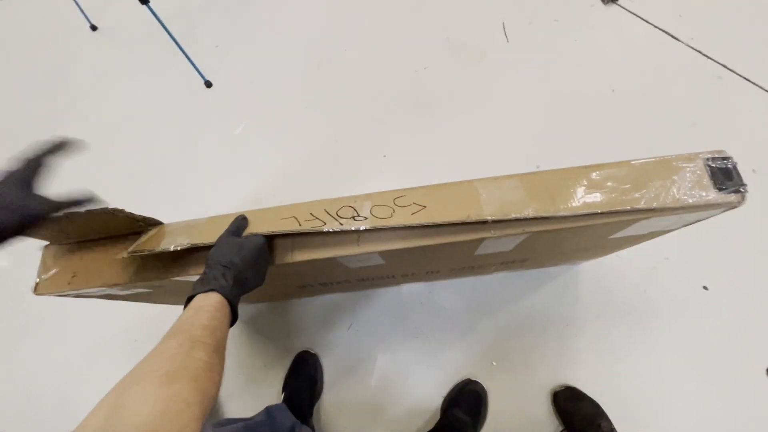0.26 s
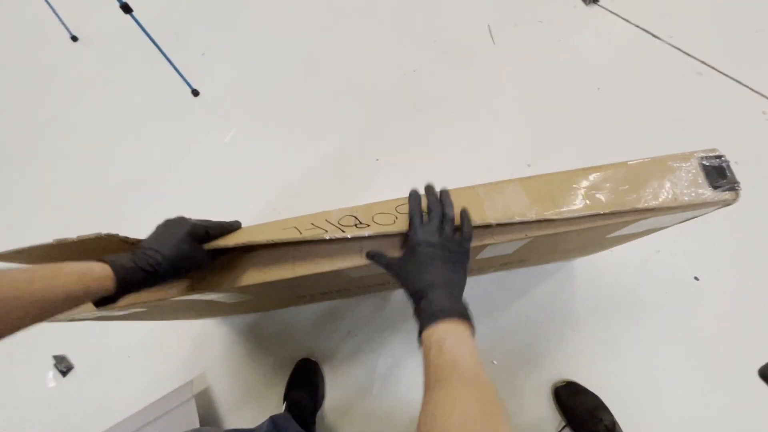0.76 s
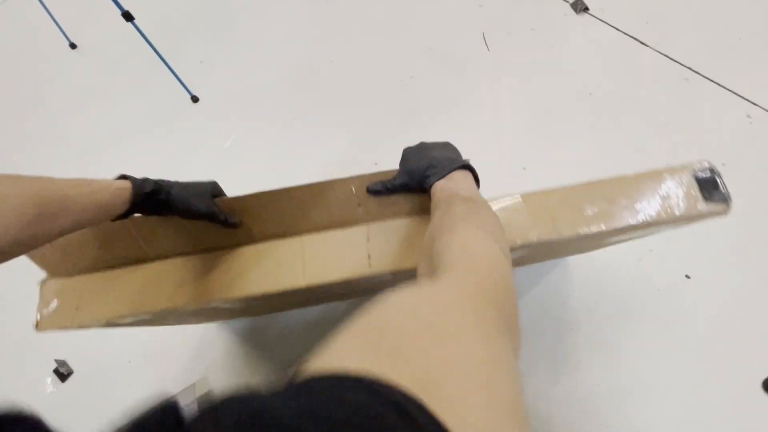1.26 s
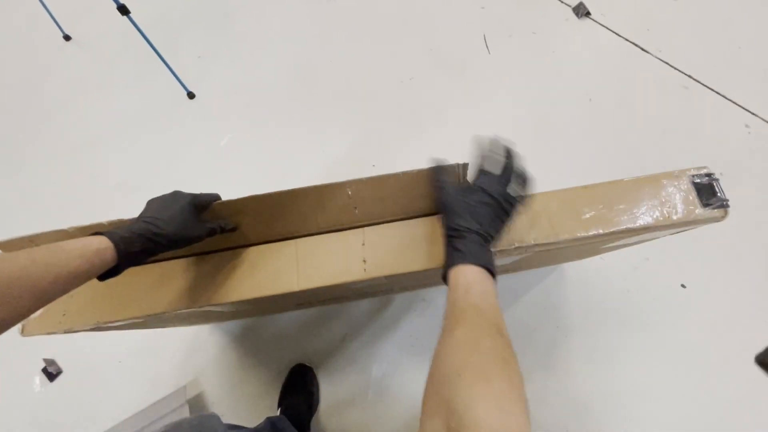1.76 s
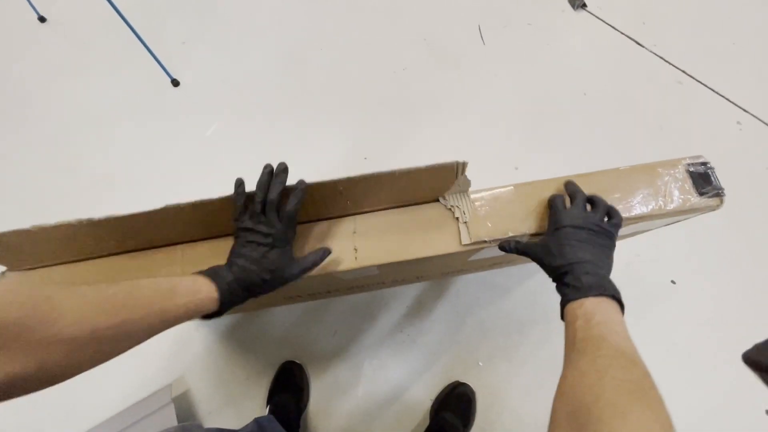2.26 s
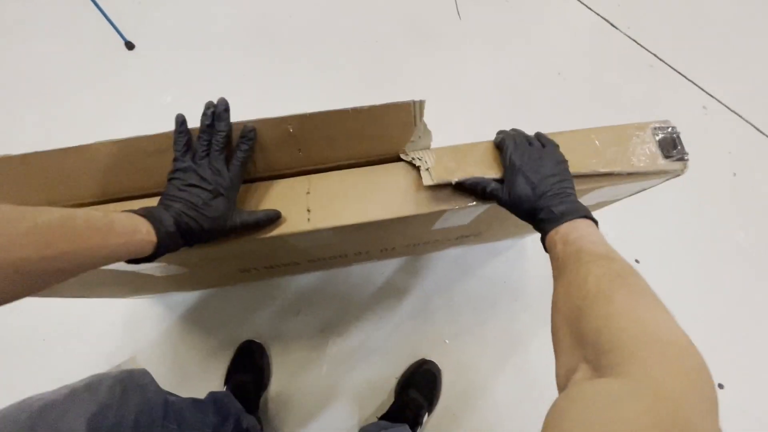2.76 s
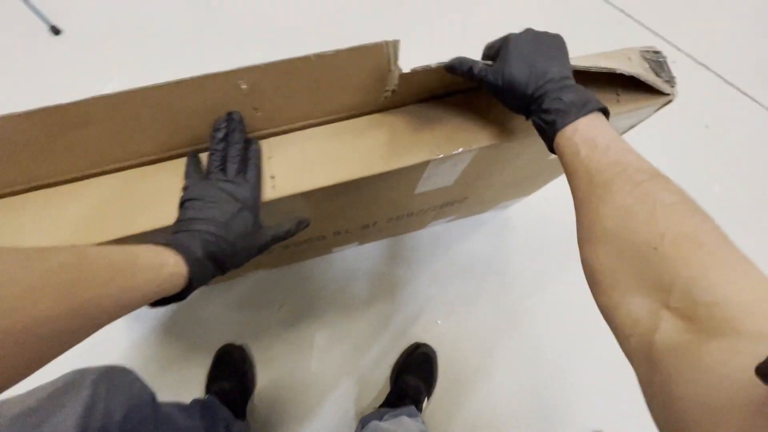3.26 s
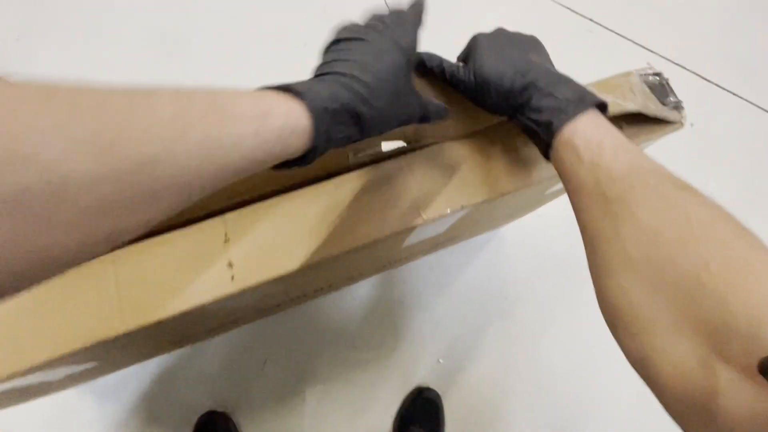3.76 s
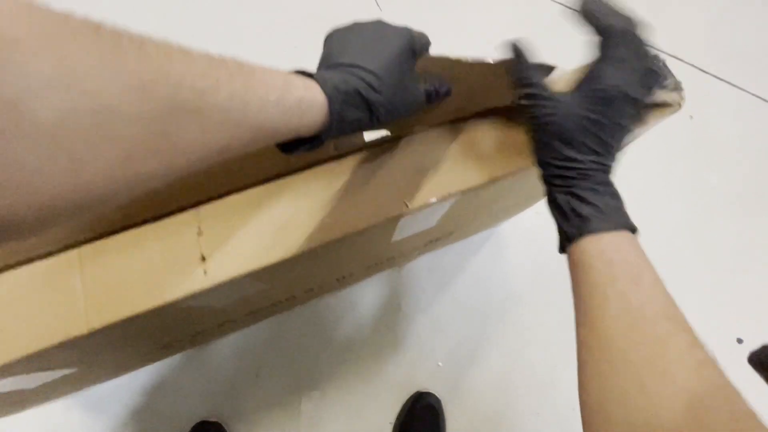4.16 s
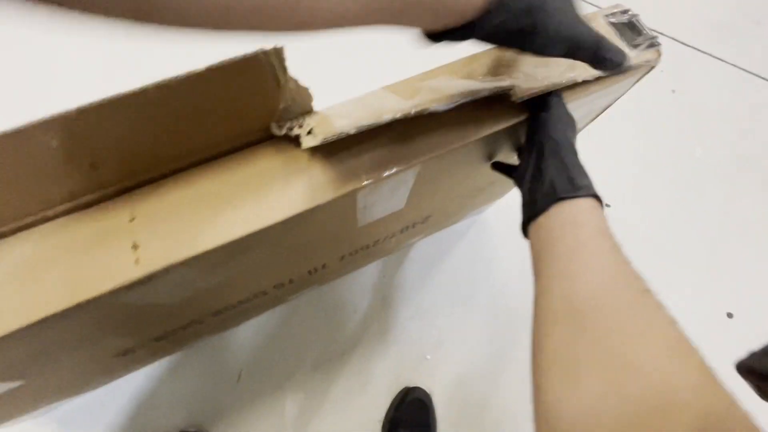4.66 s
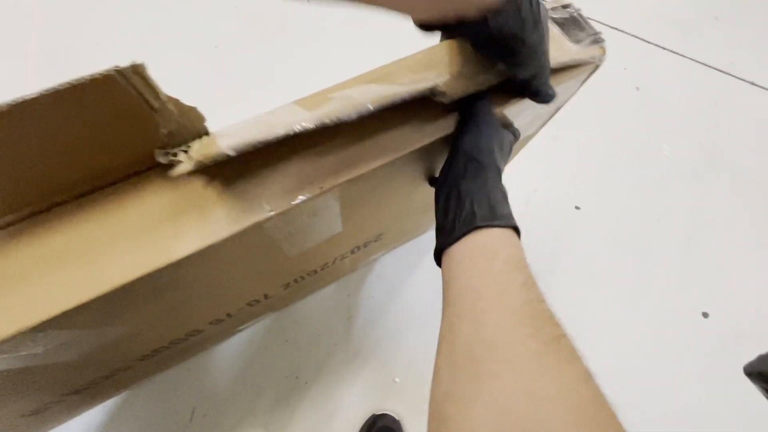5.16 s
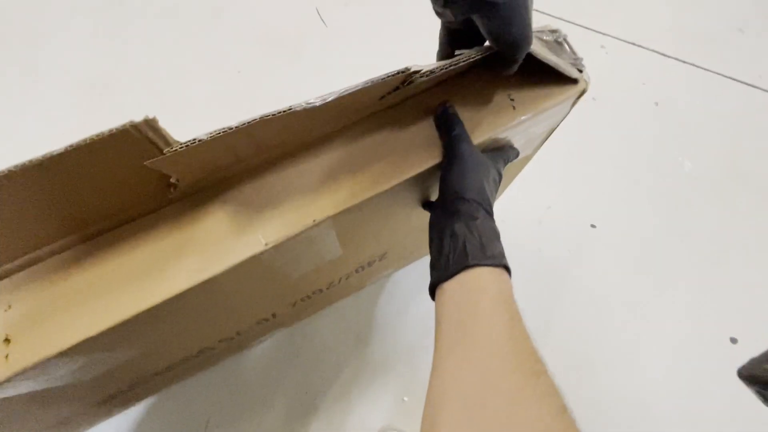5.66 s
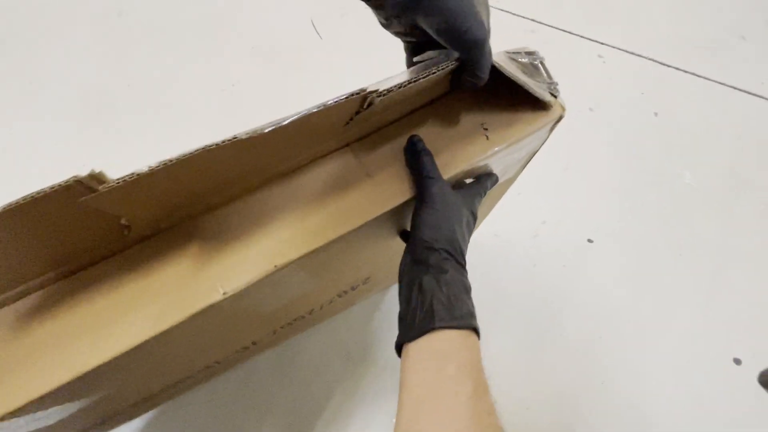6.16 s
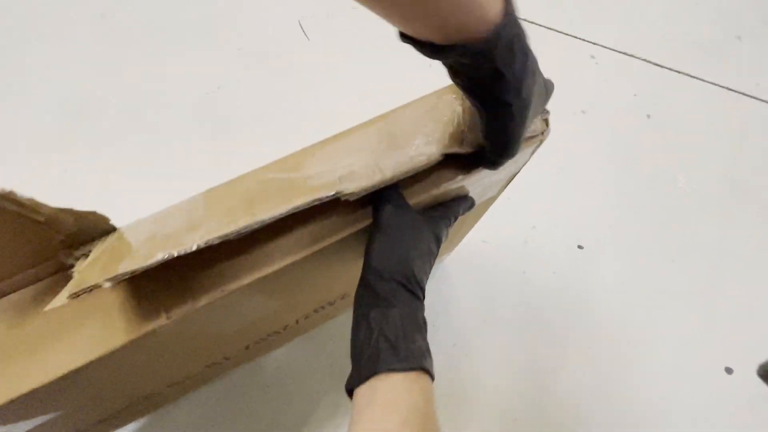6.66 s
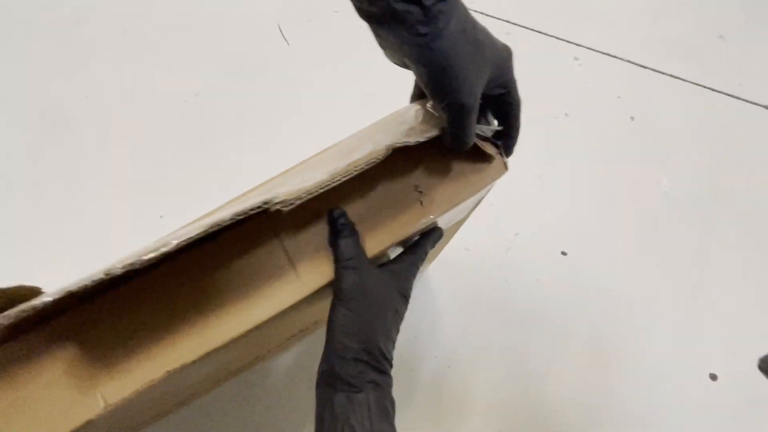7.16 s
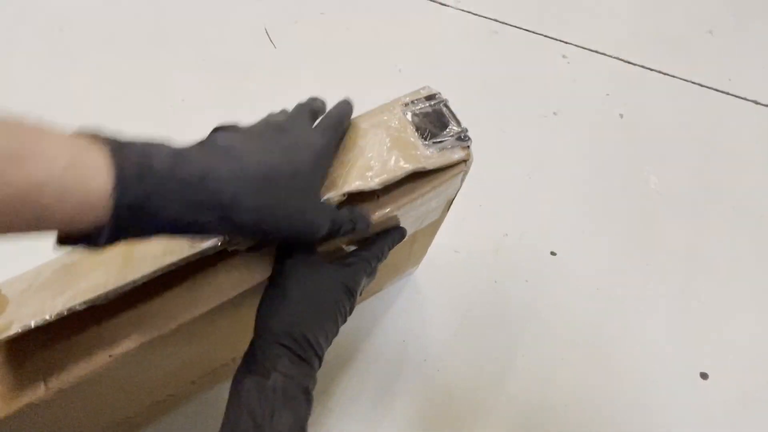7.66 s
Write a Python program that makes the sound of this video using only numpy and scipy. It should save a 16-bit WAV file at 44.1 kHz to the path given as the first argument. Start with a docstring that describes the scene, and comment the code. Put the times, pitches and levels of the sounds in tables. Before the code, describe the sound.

A bare, echoing workshop with soft, low air noise, heard through one close microphone. From 0 to 0.3 s a long cardboard box scrapes roughly over concrete, fading out. At 0.52 s a small metal tool hits the floor with a sharp clink and quick rebounds, with a lighter contact at 0.8 s. A crack and hollow thump at 1.08 s lead to a very loud, slightly overloaded flap pop at 1.28 s, booming into the room. From 1.6 to 3.2 s gloves scuff quietly, with small creaks and tape ticks. Pops build from 3.47 s into a violent tearing burst at 3.7-3.85 s, boomy and crackling. Lighter snaps follow to 4.6 s, then faint rubbing. A crisp tape tick at 6.06 s and a distinct pop at 6.16 s precede sparse creaks, crinkles and modest snaps until nearly 8 s.

```python
"""In a bare, echoing workshop, gloved hands pull open a long cardboard box close to one microphone.
The box slides on the floor, as stick-slip noise, and a small metal tool drops, as decaying modes.
Glued and taped flaps then pop loose, tear and crease: noise bursts excite resonances of panel and tape.
Large flaps boom as low modes, palms scuff and tape crinkles as filtered friction, and small creaks run
throughout; the room adds a diffuse echo and a bed of air noise, and the loudest pops overload the microphone."""
import sys
import numpy as np
from scipy import signal
from scipy.fft import rfft, irfft, next_fast_len
from scipy.io import wavfile
from scipy.ndimage import map_coordinates

SR = 44100
rng = np.random.default_rng(int(sys.argv[2]) if len(sys.argv) > 2 else 0)


def generate_wav(signal):
    """Clip the signal to [-1, 1] and save it as 16-bit WAV at the path in sys.argv[1]."""
    frames = np.transpose(np.atleast_2d(signal))
    scaled = np.clip(frames, -1, 1) * 32767
    pcm = np.round(scaled).astype(np.int16)
    wavfile.write(sys.argv[1], SR, pcm)


N = 348390

# how stiffness, hollowness and tape vary along the flap as it opens: (time [s], panel pitch [Hz],
# tape sizzle in the tick [dB], hollow knock over panel pock [dB], tape tick over fibre crack [dB])
FLAP_COURSE = [(1.3, 890, -5, 1.5, -11), (2.2, 899, -10, -8.5, -19), (3.8, 839, -17.5, -8.5, -7),
               (5.4, 1077, -3, -5.5, -3), (6.2, 1056, -2.5, -12.5, 1), (7.3, 1025, -11, -15, -1.5)]


def amp(db):
    """Decibels are twenty times the decimal logarithm of an amplitude ratio; return that ratio."""
    return 10 ** (np.asarray(db) / 20)


def unit(x):
    """Root-mean-square normalization: scale to rms 1."""
    return x / np.sqrt(np.mean(x ** 2) + 1e-20)


def burst(x):
    """Energy normalization: give a short sound the energy of 10 ms at rms 1."""
    return x * np.sqrt(SR / 100 / (np.sum(x ** 2) + 1e-20))


def along(points, hz):
    """Interpolate (frequency [Hz], value) points on a logarithmic frequency axis."""
    f, v = np.transpose(points)
    return np.interp(np.log(hz + 1), np.log(f + 1), v)


def add(track, s, x):
    """Linear superposition: mix x into the track at time s."""
    i = max(round(s * SR), 0)
    track[i:i + len(x)] += x[:N - i]


def colour(x, spectrum):
    """Minimum-phase filtering: folding the cepstrum makes the given spectrum causal."""
    m = 2 * next_fast_len(N // 2 + SR // 4)
    level_db = along(spectrum, np.fft.rfftfreq(m, 1 / SR))
    cepstrum = irfft(np.log(amp(level_db)), m)
    cepstrum[1:m // 2] *= 2
    cepstrum[m // 2 + 1:] = 0
    response = np.exp(rfft(cepstrum))
    return irfft(rfft(x, m) * response, m)[:N]


def band(x, lo_hz, hi_hz, order=2):
    """Broad resonance: a bandpass between two edges."""
    edges_hz = [lo_hz, min(hi_hz, .48 * SR)]
    return signal.sosfilt(signal.butter(order, edges_hz, "band", fs=SR, output="sos"), x)


def slips(rate, spread_db, smooth):
    """Stick-slip friction: uneven tiny catches, rate per second, on smooth rubbing under a wavering grip."""
    sizes = amp(spread_db * np.minimum(rng.standard_exponential(N), 4)) * rng.choice([-1, 1], N)
    catches = unit(sizes * (rng.random(N) < rate / SR))
    knots = np.arange(N) * 35 / SR  # 35 grip values per second
    grip_db = 2.5 * map_coordinates(rng.standard_normal(int(knots[-1]) + 2), [knots])
    return unit(amp(grip_db) * (catches + smooth * rng.standard_normal(N)))


def room_air():
    """Stationary broadband noise, shaped by a fixed spectrum, fills the room."""
    # spectrum of the air noise: (frequency [Hz], relative density [dB])
    air_spectrum = [(25, -17), (60, -8.5), (140, -1.5), (190, -5.5), (280, -8.5), (450, -5.5), (800, -16),
                    (1400, -22), (1900, -21), (3300, -25.5), (10000, -40.5), (16000, -47.5)]
    return amp(-61.0) * unit(colour(rng.standard_normal(N), air_spectrum))


def slide():
    """Stick-slip friction: the bottom edge chatters over the concrete."""
    # the box sliding on the floor: (time [s], level [dB])
    slide_course = [(0, -33), (.055, -31), (.135, -34), (.2, -41.5), (.25, -48.5), (.3, -77.5)]
    # spectrum of the scrape: (frequency [Hz], relative density [dB])
    scrape_spectrum = [(59, -57.5), (100, -21.5), (177, -15), (433, -0.5), (492, -1.5), (535, -0.5),
                       (768, -8), (1450, -4.5), (2000, -20), (3190, -15.5), (5080, -17.5), (12700, -42),
                       (16000, -56)]
    times_s, levels_db = np.transpose(slide_course)
    level_db = np.interp(np.arange(N) / SR, times_s, levels_db)
    chatter = slips(rate=2100, spread_db=2.0, smooth=0.5)
    return amp(level_db) * unit(colour(chatter, scrape_spectrum))


def handling():
    """Incoherent powers add: pulls swell, rubs fade, and both die quickly when the hand lets go."""
    # pulls on a flap, swelling until it yields:
    # (start [s], length [s], relative scuffing level [dB], crinkling over scuffing [dB])
    pulls = [(.83, 0.31, -48, 0), (1.13, .13, -49, 2), (2.28, .16, -55.5, -3), (2.6, 0.29, -66, 4.5),
             (2.97, 0.18, -43, -4.5), (3.11, .12, -45.5, 4), (3.33, 0.2, -54.5, 8.5),
             (3.55, .15, -43.5, -0.5), (3.71, 0.078, -25.5, 2), (4.47, 0.091, -38.5, -3.5),
             (4.52, 0.072, -34.5, -4.5), (5.42, 0.12, -48.5, -5.5), (6.35, 0.1495, -45, -1.5),
             (6.76, 0.042, -49.5, -4), (6.87, .07, -50.5, 0.5), (7.25, 0.31, -48, -2.5)]
    # palms landing and sliding to rest:
    # (start [s], length [s], relative scuffing level [dB], crinkling over scuffing [dB])
    rubs = [(.42, 0.3, -55.5, -3), (1.6, 0.11, -45, -5), (2.005, 0.053, -51.5, 7.5),
            (2.12, 0.012, -47.5, 1.5), (3.52, .1, -41.5, -1.5), (4.0, 0.16, -46.5, -4.5),
            (4.26, 0.22, -56.5, 0.5), (5.13, .13, -48, -9), (5.27, 0.29, -50, -11), (5.52, 0.18, -59, -2),
            (5.66, 0.094, -56, -8), (5.79, 0.1, -57, -6), (6.02, 0.113, -54.5, -8), (6.19, 0.2, -64, -10),
            (6.53, 0.2, -50.5, -4), (6.68, 0.055, -49.5, -13), (6.97, .1, -51.5, -2),
            (7.145, 0.17, -50.5, -4), (7.59, 0.064, -49.5, -1), (7.67, .07, -49, -2),
            (7.78, 0.18, -58.5, -2.5)]
    landing_s, rub_fade_db, release_s = 0.011, 7, 0.025
    grip_scuff_db, grip_crinkle_db = -67.5, -73.5  # hands that only hold the box
    scuff_power = np.full(N, amp(grip_scuff_db) ** 2)
    crinkle_power = np.full(N, amp(grip_crinkle_db) ** 2)
    age = np.arange(SR) / SR

    def swell(length):
        return np.clip(age / length, 0, 1)

    def glide(length):
        return np.clip(age / landing_s, 0, 1) * amp(-rub_fade_db * np.clip(age / length, 0, 1))

    for strokes, shape in (pulls, swell), (rubs, glide):
        for s, length, db, crinkle_db in strokes:
            release = np.exp(-np.maximum(age - length, 0) / release_s)
            effort = amp(db) * shape(length) * release
            add(scuff_power, s, effort ** 2)
            add(crinkle_power, s, (amp(crinkle_db) * effort) ** 2)
    return 10 * np.log10(scuff_power), 10 * np.log10(crinkle_power)


def hands():
    """Stick-slip friction: gloves drag over the board and flex it, and tape crinkles in sharper catches."""
    # spectra of flexing board, scuffing gloves and crinkling tape: (frequency [Hz], relative density [dB])
    flex_spectrum = [(50, -32.5), (110, -9.5), (165, -10), (205, -3.5), (265, -10.5), (350, 1.5),
                     (470, 0.5), (620, -11), (1200, -48.5)]
    scuff_spectrum = [(250, -32), (500, 0.5), (680, -1), (900, -1.5), (1200, -1.5), (1480, -1), (1850, -12),
                      (3200, -10), (8000, -40)]
    crinkle_spectrum = [(1000, -42), (2000, -2.5), (2600, 1), (3400, 4), (5200, 2), (7200, -7),
                        (9000, -16.5), (12000, -18), (16000, -27)]
    scuff_db, crinkle_db = handling()
    bending = slips(rate=450, spread_db=7.5, smooth=.6)
    drag = slips(rate=440, spread_db=2.0, smooth=1.0)
    catches = slips(rate=390, spread_db=4.5, smooth=1.0)
    flex = amp(scuff_db - 8.0) * unit(colour(bending, flex_spectrum))
    scuff = amp(scuff_db) * unit(colour(drag, scuff_spectrum))
    crinkle = amp(crinkle_db) * unit(colour(0.82 * drag + catches, crinkle_spectrum))
    return flex + scuff + crinkle


def creaks():
    """Buckling instability: small flutes give way at random, louder while the hands work harder."""
    out, t = np.zeros(N), np.arange(SR // 60) / SR
    scuff_db, crinkle_db = handling()
    count = 190  # one in each equal slot of time
    crush = t * np.exp(-t / .0005)
    for slot, (when, size, stiffness) in enumerate(rng.random((count, 3))):
        i = int((slot + when) / count * (N - 1))
        fibres = rng.standard_normal(len(t)) * crush
        shift = np.sqrt(.5 + stiffness)  # pitch follows the root of stiffness
        pock = amp(scuff_db[i]) * burst(band(fibres, 750 * shift, 1350 * shift))
        tick = amp(crinkle_db[i] + 2.5) * burst(band(fibres, 3000 * shift, 6800 * shift, order=3))
        add(out, i / SR, amp(14 * size - 10) * (pock + tick))
    return out


def workshop(x):
    """Diffuse reverberation: hard floor and distant walls return noise that decays at each frequency."""
    # decay of the echo: (frequency [Hz], 60 dB decay time [s])
    decay_times = [(100, 2.1), (200, 0.54), (500, 0.73), (3000, 0.886), (5000, 0.7), (9000, 0.57),
                   (15000, 0.37)]
    # colour of the echo: (frequency [Hz], relative level [dB])
    echo_spectrum = [(50, -2), (180, 9), (500, -0.5), (1200, -2.5), (5000, 0), (9000, -1), (15000, 1.5)]
    hz, t, z = signal.stft(rng.standard_normal(SR + SR // 4), SR, nperseg=256)
    decay_db = along(echo_spectrum, hz)[:, None] - 60 * t / along(decay_times, hz)[:, None]
    tail = signal.istft(z * amp(decay_db), SR, nperseg=256)[1]
    tail = tail * (1 - np.exp(-np.arange(len(tail)) / SR / 0.011))  # gradual build-up
    return signal.fftconvolve(x, tail / np.linalg.norm(tail))[:N]


def breaks():
    """Source mixing: yield (s, crumble s, knock, pock, crack, tick dB), set by the place along the flap."""
    # the board giving way:
    # (time [s], crumble time [s], panel pock as power over 10 ms [dB], fibre crack over the pock [dB])
    fractures = [(0.2469, .0007, -49.5, 6), (1.0811, .0012, -26, 7.5), (1.117, .002, -42, 2.5),
                 (1.232, 0.0021, -43.5, 11.5), (1.2638, .0007, -32.5, 9), (1.2757, 0.005, -7.5, 2.5),
                 (1.2853, 0.011, -17, -10), (1.6364, 0.00084, -34, 1), (1.7207, 0.0069, -52, 6),
                 (1.993, 0.0031, -56, 12.5), (2.2972, 0.0042, -49.5, 7.5), (2.438, 0.0061, -55, 13),
                 (2.776, 0.0068, -62.5, 14), (2.993, .0019, -49, 8), (3.067, 0.0033, -56, 9.5),
                 (3.1324, 0.0017, -46.5, -1.5), (3.2294, .0008, -40, -19), (3.4691, .0021, -30, -7),
                 (3.5072, .0067, -23.5, -3), (3.5905, 0.0054, -26.5, -4), (3.718, 0.0052, -7, -8),
                 (3.7322, .004, -11.5, -6.5), (3.7535, 0.00067, -14.5, -8), (3.786, 0.0024, -24, -2),
                 (3.7952, 0.00072, -18, 1), (3.8214, 0.0013, -20, 2), (3.8837, 0.013, -35.5, 4.5),
                 (4.122, 0.00078, -36.5, -8), (4.137, 0.0013, -47, 3.5), (4.5477, 0.00274, -37, -3),
                 (4.5998, 0.0059, -35.5, -6.5), (5.3596, 0.0074, -34, -0.5), (5.529, 0.001, -41.5, 2.5),
                 (6.1624, .0017, -18, -11), (6.2535, 0.0011, -34.5, -1), (6.3363, .001, -41, -11.5),
                 (6.4465, .0015, -48.5, -1.5), (6.5716, .0045, -38, -10), (6.6688, 0.001, -43.5, -6),
                 (6.9343, 0.0025, -43, -0.5), (7.0241, 0.0004, -47.5, 13.5), (7.1325, 0.0021, -35.5, -11.5),
                 (7.342, 0.0011, -30, -0.5), (7.518, 0.0018, -45, 1.5), (7.5604, 0.0039, -45.5, 2)]
    # packing tape ticking as it lets go: (time [s], level [dB])
    tape_ticks = [(1.1874, -45), (1.96, -66), (2.097, -73), (2.82, -53), (2.888, -50.5), (2.902, -47.5),
                  (3.2235, -39), (3.503, -42.5), (3.8152, -27), (4.286, -50.5), (4.4134, -53.5),
                  (5.211, -63), (5.355, -46), (5.2921, -56), (5.8541, -53.5), (6.06, -31), (6.1711, -34.5),
                  (6.9419, -40.5), (6.9539, -38.5), (7.1122, -41), (7.303, -41.5), (7.3171, -41)]
    course_s, _, _, hollow_db, tape_db = np.transpose(FLAP_COURSE)
    for s, crumble, pock_db, bright_db in fractures:
        knock_db = pock_db + np.interp(s, course_s, hollow_db)
        crack_db = pock_db + bright_db
        yield s, crumble, knock_db, pock_db, crack_db, crack_db + np.interp(s, course_s, tape_db)
    for s, db in tape_ticks:  # brief, and barely moving the board
        yield s, 0.0013, db - 28.5, db - 9, db - 7, db


def snap_voices(drive, pitch_hz, sizzle_db, shift, breadth):
    """Forced resonance: a fracture shakes hollow box, panel, stiff fibres and tape."""
    knock = band(drive[0], 315, 420 * breadth)
    pock = band(drive[1], pitch_hz / breadth, pitch_hz * breadth)
    crack = band(drive[2], 3350 * shift / breadth, 3350 * shift * breadth)
    sizzle = amp(sizzle_db) * unit(band(drive[2], 5900, 12000))
    tick = unit(band(drive[3], 5300 * shift, 7500 * shift)) + sizzle
    return [burst(x) for x in (knock, pock, crack, tick)]


def snaps():
    """Brittle fracture: quick showers of breaking fibres; return near sound and what spreads into the room."""
    near, far = np.zeros(N), np.zeros(N)
    lead = .004  # s of faint noise rising into each break
    t = np.arange(SR // 12) / SR - lead
    after = np.maximum(t, 0)
    course_s, pitches, sizzles, _, _ = np.transpose(FLAP_COURSE)
    for s, crumble, *levels_db in breaks():
        shift = np.exp(0.32 * (rng.random() - .5))  # every crease has its own stiffness
        breadth = 1.28 + .5 * min(crumble / 0.0089, 1)  # a clean snap rings narrowly, a long rip broadly
        timbre = np.interp(s, course_s, pitches), np.interp(s, course_s, sizzles), shift, breadth
        lead_in = min(.2, amp(-54.5 - max(levels_db)))  # a faint noise swells briefly into the break
        envelope = (t >= 0) + lead_in * (t < 0) * np.exp(-np.abs(t) / 0.0018)
        fracture = np.exp(-after / max(crumble, 1e-4))
        shiver = fracture + 0.35 * np.exp(-after / 0.0053)  # waves run back and forth in the panel
        hollow = fracture + .5 * np.exp(-after / 0.0097)
        drive = rng.standard_normal((4, len(t))) * envelope * [hollow, shiver, shiver, shiver]
        fold_delay = round(SR * .0005 * (1 + rng.random()))
        drive = drive + .5 * np.roll(drive, fold_delay, axis=1)  # reflection off the nearest fold
        add(near, s - lead, amp(levels_db) @ snap_voices(drive, *timbre))
        # summed over all directions, the fracture acts as one clean impulse
        impulse = np.tile(signal.unit_impulse(len(t)), (4, 1))
        add(far, s + .008 * rng.random(), amp(levels_db) @ snap_voices(impulse, *timbre))
    return near, far


def dropped_tool():
    """Impact excitation of damped modes: each contact with the floor gives a crack and a clink."""
    # a small metal tool bouncing on the floor: (time [s], ring level [dB], crack level [dB])
    bounces = [(.517, -24.5, -27.5), (0.54, -29.5, -38), (0.561, -37.5, -43.5), (0.582, -37, -43.5),
               (.807, -43, -52.5), (.814, -38, -36.5)]
    # modes of the tool: (frequency [Hz], mean relative level [dB], 60 dB decay time [s])
    tool_modes = [(483, -3.5, 0.019), (1462, -6.5, 0.029), (1780, -0.5, 0.024), (2140, -5.5, .02),
                  (2320, -1, 0.044), (2317, -2, 0.031), (2340, -25.5, .45), (2500, -22, 0.49),
                  (3070, -4.5, 0.017), (4540, -16.5, .008)]
    out, t = np.zeros(N), np.arange(SR // 5) / SR
    for s, ring_db, crack_db in bounces:
        ring = np.zeros(len(t))
        for hz, level, t60 in tool_modes:
            envelope = amp(level + rng.normal(0, 1.2) - 60 * t / t60)
            ring += envelope * np.sin(2 * np.pi * (hz * t + rng.random()))
        crack = band(rng.standard_normal(len(t)) * np.exp(-t / 0.00098), 1400, 3600)
        add(out, s, amp(ring_db) * burst(ring) + amp(crack_db) * burst(crack))
    return out


def booms():
    """Modal resonance: a flap springing free sets the large panels and the enclosed air swinging."""
    # blows that set the whole box booming: (time [s], level [dB])
    blows = [(0.928, -45), (1.085, -24), (1.286, -13), (1.636, -53), (2.297, -43.5), (2.442, -45),
             (3.227, -34), (3.511, -29), (3.613, -41), (3.719, -22), (3.824, -38.5), (4.122, -37),
             (4.619, -45), (7.561, -53), (7.69, -53.5)]
    # modes of the hollow box: (mean frequency [Hz], mean relative level [dB], 60 dB decay time [s])
    box_modes = [(38.06, -5, 0.01), (81.4, -15, 0.13), (129, -7, 0.087), (164, 0.5, 0.082), (217, 2, 0.072),
                 (360, -1, 0.088), (409.5, 2.5, 0.11), (468, 5, 0.06)]
    out, t = np.zeros(N), np.arange(SR // 2) / SR
    onset = 1 - np.exp(-t / 0.0043)
    for s, db in blows:
        ring = np.zeros(len(t))
        for hz, level, t60 in box_modes:
            envelope = amp(level + rng.normal(0, 2) - 60 * t / t60)
            ring += envelope * np.sin(2 * np.pi * (hz * rng.normal(1, 0.032) * t + rng.random()))
        add(out, s, amp(db) * burst(ring * onset))
    return out


def scene():
    """Direct-to-reverberant ratio: sounds at the hands are dry; the tool on the floor carries more room."""
    rub = amp(-1.5) * hands() + creaks() + slide()
    pops, spread = snaps()
    tool, boom = dropped_tool(), booms()
    echo = workshop(amp(-16.0) * spread + amp(-14.5) * boom + amp(-15.0) * rub + amp(-6.5) * tool)
    return (pops + boom + rub + tool + echo + room_air())[None]


def record(dry):
    """Saturation and band limiting: the microphone flattens the loudest peaks, then drops the top treble."""
    ceiling, top_hz = .55, 16100
    held = dry / (1 + np.abs(dry / ceiling) ** 4) ** (1 / 4)
    m = next_fast_len(N + SR // 4)
    passed = np.fft.rfftfreq(m, 1 / SR) < top_hz
    return irfft(rfft(held, m) * passed, m)[:, :N]


dry = scene()
out = record(dry)
generate_wav(out)
```